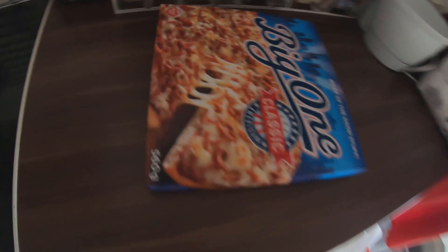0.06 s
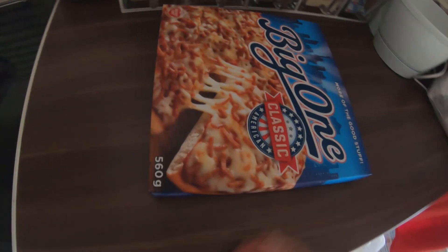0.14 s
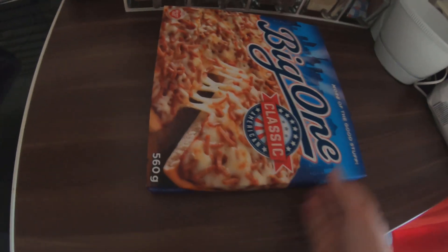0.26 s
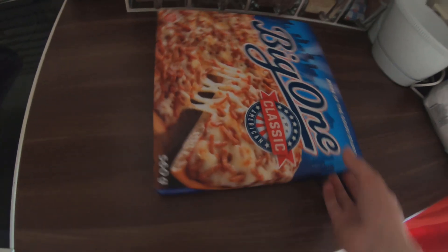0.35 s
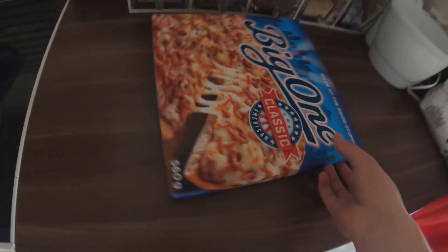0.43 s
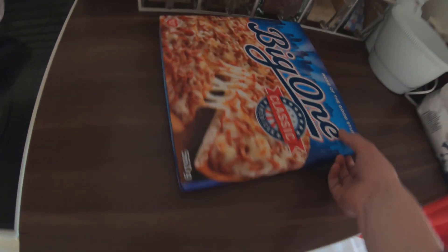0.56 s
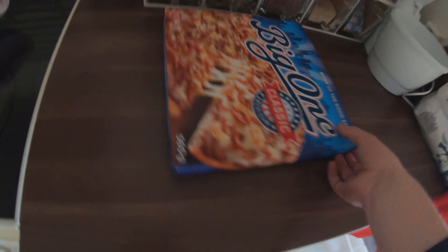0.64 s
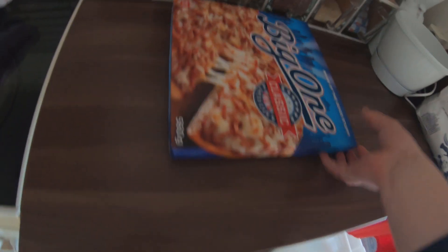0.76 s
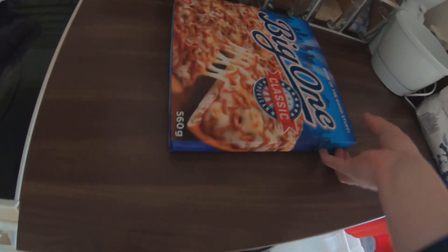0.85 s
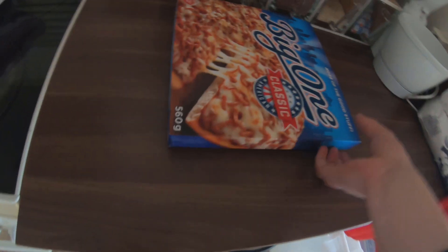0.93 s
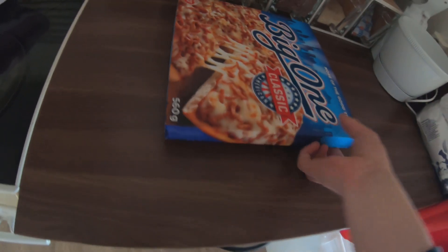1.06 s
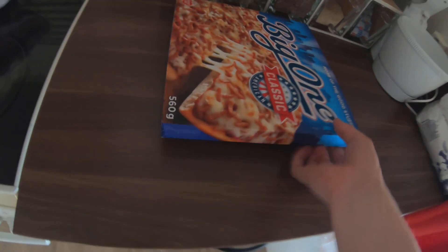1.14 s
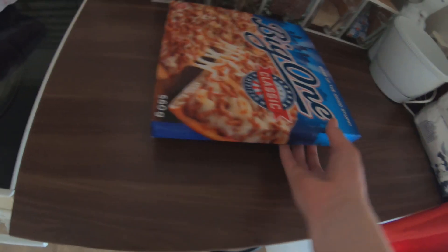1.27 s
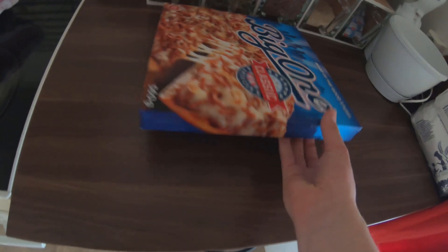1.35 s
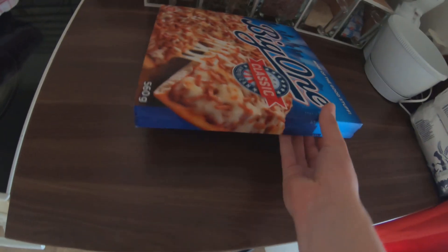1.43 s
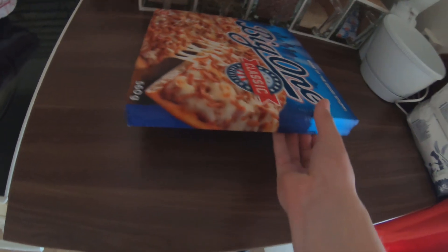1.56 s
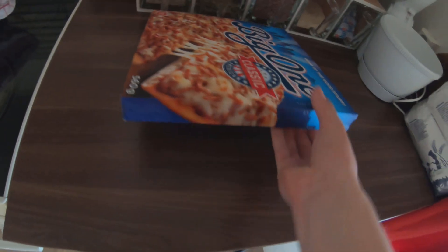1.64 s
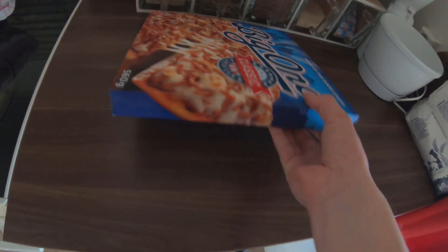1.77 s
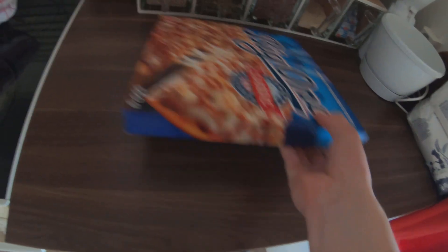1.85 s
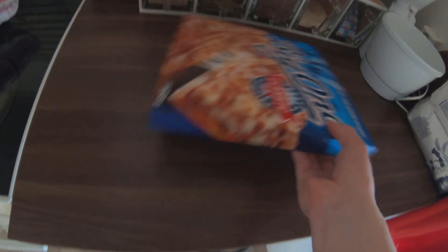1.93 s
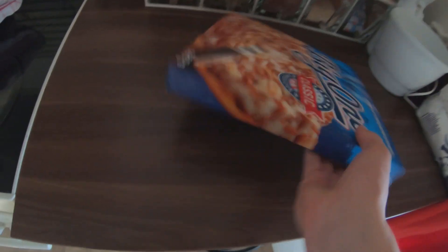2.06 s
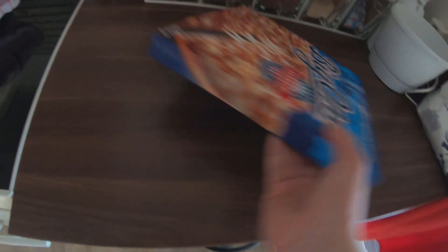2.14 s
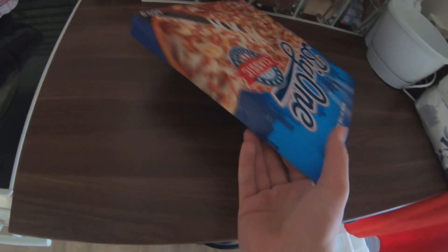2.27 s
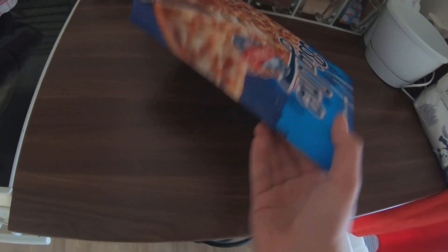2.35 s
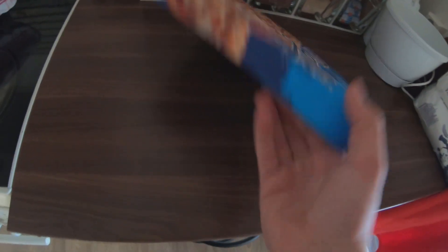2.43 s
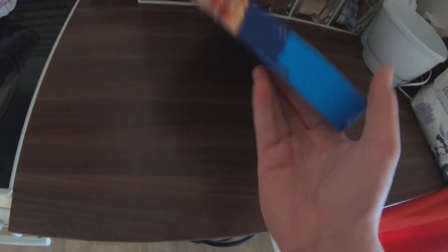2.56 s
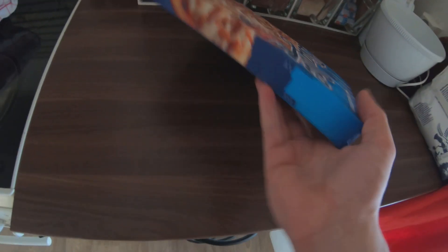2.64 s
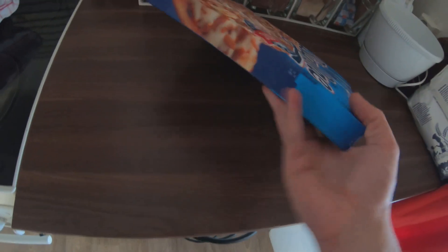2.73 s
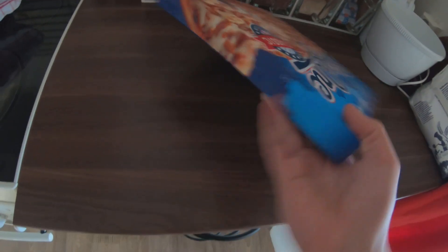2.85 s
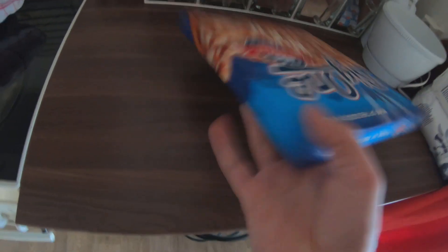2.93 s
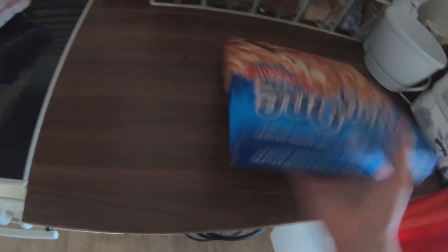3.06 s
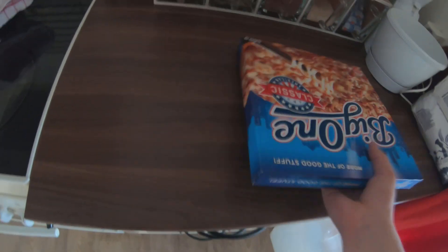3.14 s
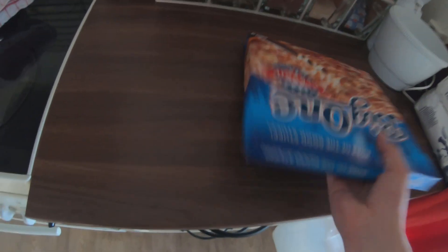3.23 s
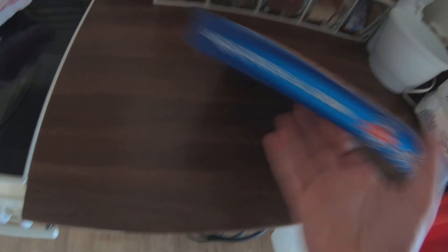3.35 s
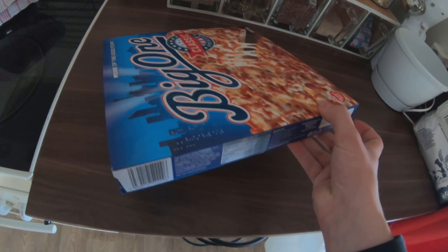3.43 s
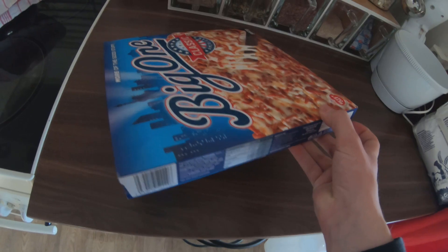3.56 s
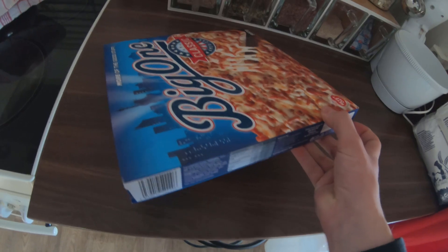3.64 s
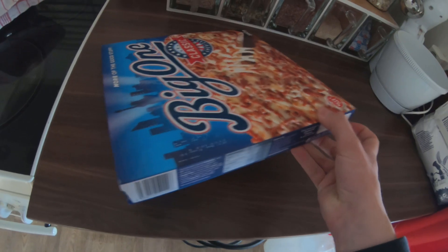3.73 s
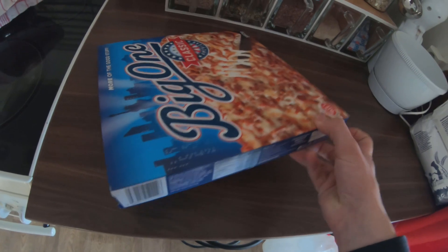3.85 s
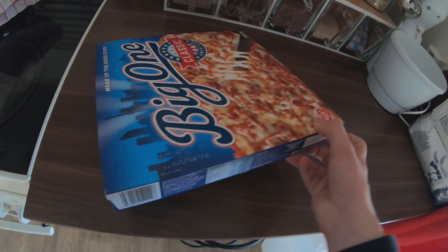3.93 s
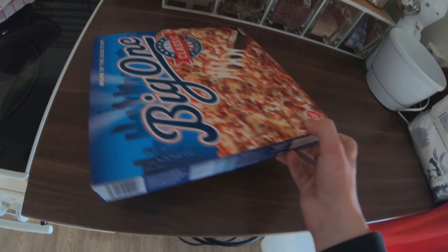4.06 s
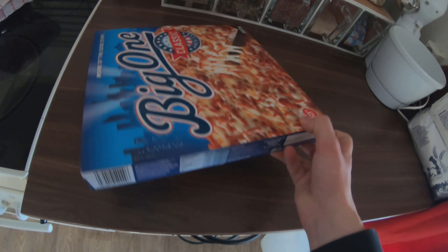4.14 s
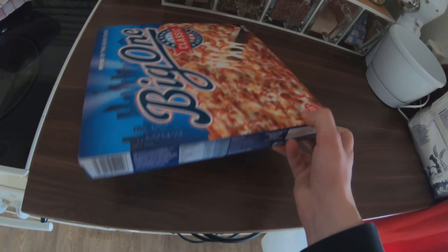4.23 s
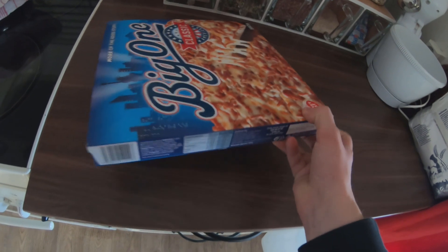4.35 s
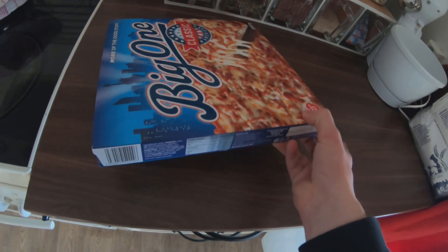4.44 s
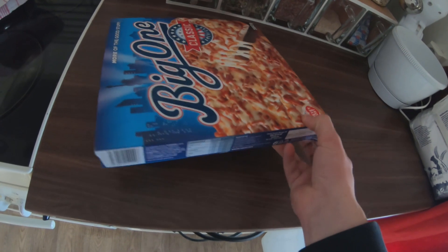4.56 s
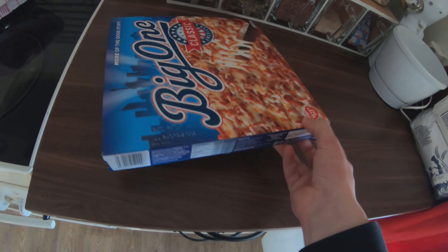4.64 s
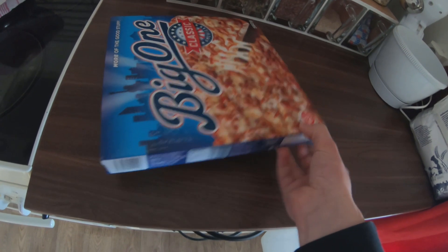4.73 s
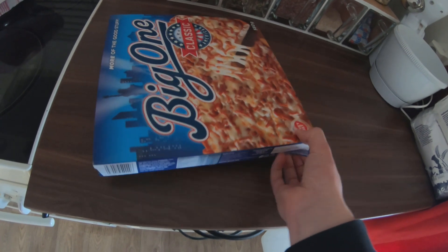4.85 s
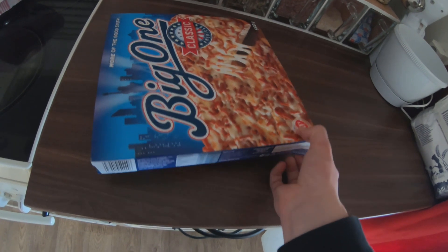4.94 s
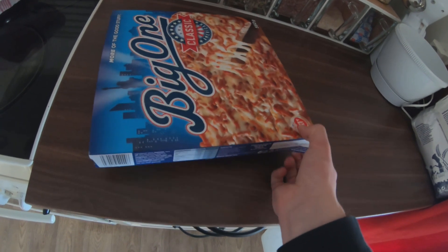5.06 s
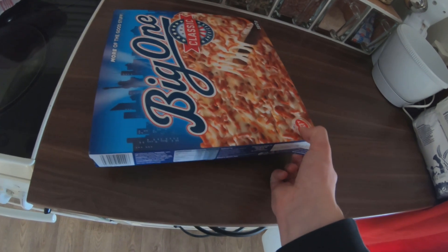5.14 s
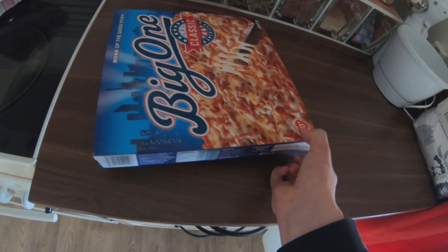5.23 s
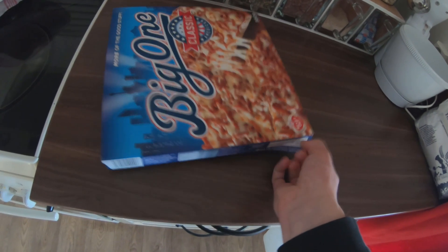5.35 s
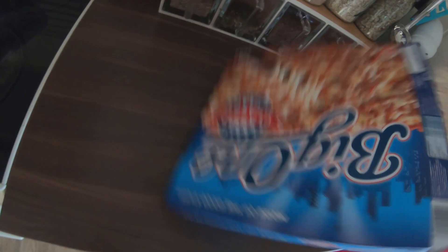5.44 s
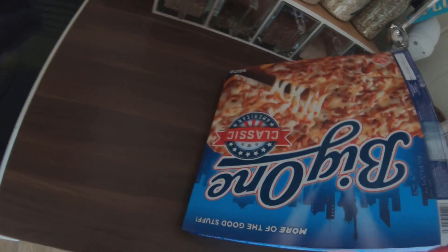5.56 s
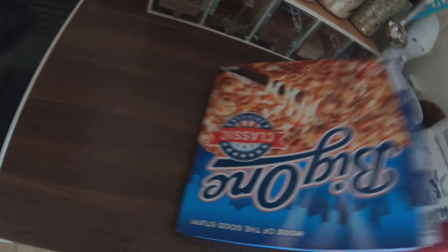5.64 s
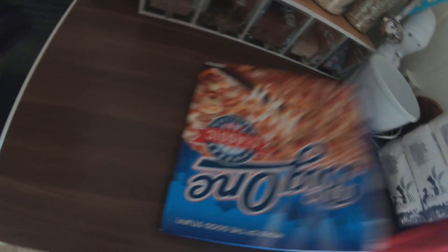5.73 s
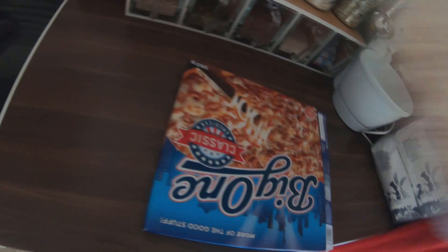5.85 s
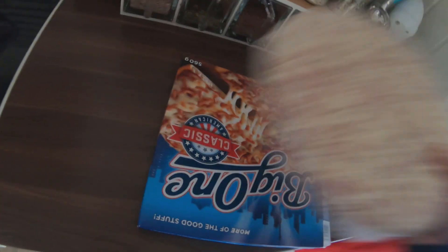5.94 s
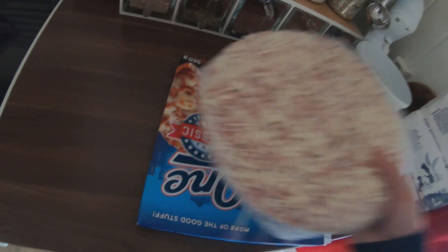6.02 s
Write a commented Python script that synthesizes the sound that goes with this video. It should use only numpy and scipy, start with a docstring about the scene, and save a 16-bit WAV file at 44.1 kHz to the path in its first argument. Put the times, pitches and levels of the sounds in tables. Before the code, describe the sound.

Close, dry-sounding handling of a stiff box holding a frozen pizza. Light finger taps and faint rubbing lead to busier, louder knocks and a strong slide as it is turned over; the room ring stops abruptly around the middle. Quieter scattered clicks and bumps come next, then heavy cardboard knocks with bright snapping wrap. Short kitchen reflections and soft low rumble from a head-worn microphone.

```python
"""A cardboard box with a hard frozen pizza loose inside is tapped, lifted, turned over and dropped on a kitchen counter.
It opens on a rubbing grip and soft taps, then firmer knocks; just after 3.4 s the room's ring is cut short.
Sparser handling follows, then hard knocks and a flurry of plastic and flap snaps from about 5.1 s to the end.
Blows ring the box, rubs are stuttering noise, snaps are tiny pitched puffs, and a small kitchen answers blows and snaps.
Air and the low rumble of a head-worn camera run throughout; the loudest peaks are rounded off softly."""
import sys
import numpy as np
from scipy import signal
from scipy.fft import rfft, irfft, next_fast_len
from scipy.io import wavfile
from scipy.ndimage import map_coordinates

SR = 44100
rng = np.random.default_rng(int(sys.argv[2]) if len(sys.argv) > 2 else 0)


def output_pcm(signal):
    """Save a mono or channel-first signal as 16-bit PCM at the path in sys.argv[1].

    Samples are clipped to [-1, 1] before scaling.
    """
    pcm = np.clip(np.atleast_2d(signal).T, -1, 1) * 32767
    wavfile.write(sys.argv[1], SR, np.round(pcm).astype(np.int16))


N = 268569


def amp(db):
    """Gain of a level in dB."""
    return 10 ** (np.asarray(db) / 20)


def unit(x):
    """Scale x to rms 1."""
    return x / np.sqrt(np.mean(x ** 2) + 1e-20)


def along(points, hz):
    """Read a (frequency, value) curve on a log frequency axis."""
    point_hz, value = np.transpose(points)
    return np.interp(np.log(hz + 1), np.log(point_hz + 1), value)


def curves(rows):
    """Draw one automation curve, sample by sample, for each column after the time."""
    time_s, *columns = np.transpose(rows)
    return [np.interp(np.arange(N) / SR, time_s, column) for column in columns]


def wobble(rate_hz):
    """A smooth random curve with rate_hz knots a second."""
    knots = rng.standard_normal(int(N * rate_hz / SR) + 4)
    return map_coordinates(knots, [np.arange(N) * rate_hz / SR])


def filtered(x, response):
    """Shape x by a complex response of frequency."""
    size = next_fast_len(N + SR // 2)  # spare room keeps tails from wrapping round
    spectrum = rfft(x, size) * response(np.fft.rfftfreq(size, 1 / SR))
    return irfft(spectrum, size)[..., :N]


def ringing(x, modes):
    """Ring x through resonances between steep low and high skirts; white noise keeps its rms."""
    def response(f):
        peaks = 0
        for k, (centre, width, db) in enumerate(modes):
            peak = 1j * f * width / (centre * centre - f * f + 1j * f * width)
            peaks = peaks + (-1) ** k * amp(db) * peak  # neighbours alternate in sign
        low, high = 0.91 * modes[0][0], 1.275 * modes[-1][0]
        low_skirt = f * f / (f * f - low * low - 1.4j * f * low)
        high_skirt = high * high / (high * high - f * f + 1.4j * f * high)
        shape = peaks * low_skirt * high_skirt
        return unit(np.abs(shape)) * np.exp(1j * np.angle(shape))
    return filtered(x, response)


# How alike the left and right ports hear a noise: pitch_hz, likeness (1 = identical)
LIKENESS = [(60, 0.77), (250, 1), (600, 0.76), (1200, 0.4), (2500, 0.76), (5000, 0.62), (9000, .05),
            (15000, 0.13)]


def pair(likeness):
    """Stereo white noise, built from mid and side noises so the ports share more or less of each frequency."""
    def mid_and_side(hz):
        turn = np.arccos(np.clip(along(likeness, hz), -1, 1)) / 2
        return np.array([np.cos(turn), np.sin(turn)])
    mid, side = filtered(rng.standard_normal((2, N)), mid_and_side)
    return np.array([mid + side, mid - side])


# Blows of fingers, nails and pizza, levels before the mix of parts: start_s, level_db,
# weight_db (panel), edge_db (board), shock_db (counter), contact_ms (t60 before each part's stretch),
# rise_ms, left_right_db (positive = left)
BLOWS = [(0.004, -35, 11.5, -17, 9, 310, 0.97, 0), (0.298, -27, -17, -11, -28, 15, 1.6, 0),
         (0.462, -37, -23, -10, -22, 220, 0.5, -3), (0.498, -33.5, -5, -18, -28, 92, 0.48, 1.9),
         (0.563, -24, -28, 0.5, -45, 50, 1.16, 1), (0.608, -40, -2.5, -6, -25, 190, 0.5, 4),
         (0.946, -29.5, -9, -3.5, -25, 420, 0.68, 2), (1.044, -14.5, -33, -13, -59, 23, 0.89, -0.5),
         (1.178, -13, -16, -6, -53, 43, 1.16, 0.5), (1.299, -19, -16, -9, -17.5, 49, 0.72, 0),
         (1.488, -35, -8.5, -0.5, -25, 100, 0.9, 5), (1.873, -17.5, -15, -12, -34, 95, 0.49, 3),
         (2.017, -14, -4.5, -3.5, -24, 124, 1.33, 2), (2.084, -1.5, -24, -25, -38, 50, 0.78, -1),
         (2.241, -23.5, -9, 1, -22, 220, 3.3, 1), (2.529, -13.5, -34, -5.5, -43, 80, 4.4, 1),
         (2.62, -25.5, -18, -6, -19.5, 240, 0.51, 2.5), (2.816, -22, -29, -2, -43, 170, 0.14, 0.5),
         (2.898, -10.5, -9, -13, -22, 33, 2.15, 1), (3.007, -44.5, 23, -9, 6, 140, 0.42, 1),
         (3.042, -3.5, -10, -13.5, -21, 92, 0.52, 0.5), (3.124, -12, -1.5, 0, -16, 44, 0.92, -1),
         (3.196, -23, -38, -2, -26, 400, 0.21, -4), (3.353, -10, -7, -15, -28, 74, 0.13, -1.5),
         (3.421, -23.5, -42, 1, -51, 20, 0.19, -1), (3.529, -24.5, -19.5, -13.5, -52, 63, 2.1, 1.5),
         (3.795, -26.5, -12, 2.5, -18, 28, 0.71, 0), (4.24, -21.5, -25, -3, -55, 73, 1, 1),
         (4.37, -33.5, -16, -1, -50, 94, 1.2, 0), (4.49, -24.5, -21.5, -5, -53, 66, 1.7, -1),
         (4.549, -7, -30.5, -9, -75, 70, 5.4, 0.5), (4.744, -40, -5.5, -2, -33, 120, 1.3, 8),
         (4.776, -21, -18.5, -15, -48, 29, 0.62, 1.6), (5.134, -29, -17.5, -25, -47, 160, 0.4, 1),
         (5.311, -12, -14.5, 7, -16, 50, 0.86, 0), (5.327, -18.5, -9, 2.5, -4.5, 98, 0.32, 1),
         (5.48, -1.5, -14.5, -29, -11.5, 32, 1.02, -4), (5.812, -11.5, -17.5, 5.5, -21, 40, 0.82, -5),
         (5.821, -13, -3.5, -12, -17.5, 104, 1.9, 3.5)]
# Resonances of each part: pitch_hz, width_hz, level_db
COUNTER_MODES = [(43.2, 33.3, -1), (59.3, 7.9, 7), (95, 56, -4)]  # kitchen counter
PANEL_MODES = [(127.8, 28.4, -5), (158.7, 47, 0), (245.8, 25, -2), (336.7, 70, -7)]  # large box panels
HOLLOW_MODES = [(420, 64, -5), (553, 54, 0), (715.5, 85, 0)]  # air inside the box
BOX_MODES = [(785, 130, -3.5), (930, 178, -2.5), (1163, 136, -6), (1321, 107, -4.5), (1667, 1480, -13)]  # body of the box
BOARD_MODES = [(1974, 700, -2), (2810, 730, 6.5), (3060, 1510, 4.5), (4150, 4500, -13)]  # stiff cardboard
CRACK_MODES = [(5160, 2730, 38.5), (6750, 690, -16.5), (9940, 7500, -26.5), (14200, 220, 8)]  # bright crack and hiss
# the air inside takes part of a blow's weight, less what the counter drains; the crack follows the edge
HOLLOW_SHARE, COUNTER_DAMPS, CRACK_SHARE = 0.82, 0.26, 1.14


def knocks():
    """Each blow is a push and a short rattle of contact ringing every part; a slow rise pushes high parts less."""
    # (modes, level dB, stretch of the contact, share of the push)
    parts = [(BOX_MODES, -2.5, .75, 3.5), (COUNTER_MODES, 3, 1.6, 2.5), (PANEL_MODES, 2.2, 1.5, 2.2),
             (HOLLOW_MODES, -4, 1.1, 3), (BOARD_MODES, -3, .6, 4.5), (CRACK_MODES, -9, .45, 5)]
    longest = SR // 6
    out = np.zeros((2, N))
    for column, (modes, part_db, stretch, push_share) in enumerate(parts):
        centre = modes[len(modes) // 2][0]
        rattle, force = pair(LIKENESS), np.zeros((2, N))
        for start_s, level_db, weight, edge, shock, contact_ms, rise_ms, left_right_db in BLOWS:
            hollow = HOLLOW_SHARE * weight - COUNTER_DAMPS * shock
            reach_db = (0, shock, weight, hollow, edge, CRACK_SHARE * edge)[column]
            start = round(start_s * SR)
            at = slice(start, min(start + longest, N))
            ms = 1000 * np.arange(at.stop - at.start) / SR
            rise = max(rise_ms, .2)
            fade = amp(-60 * ms / (max(contact_ms, 4) * stretch))
            shake = (1 - np.exp(-ms / rise)) * fade
            push = push_share * min(1, 900 / (centre * rise)) * amp(-ms * centre / 22)
            # low parts reach both ports more alike
            sides = amp(np.array([[left_right_db], [-left_right_db]]) / 2 * min(1, centre / 900))
            force[:, at] += amp(level_db + reach_db + part_db) * (rattle[:, at] * shake + push) * sides
        out += ringing(force, modes)
    return out


# Snaps of the wrap and the glued flap: start_s, level_db (before a common trim), pitch_hz
WRAP_AND_FLAP_SNAPS = [(1.127, -44, 3220), (1.267, -37, 1420), (1.3887, -37.5, 1930), (1.78, -36, 3080),
                       (1.929, -35.5, 3460), (2.315, -28, 2080), (2.3544, -31, 2170), (2.664, -29.5, 3340),
                       (2.701, -48, 2860), (2.732, -48.5, 5850), (2.7666, -42.5, 2700), (2.793, -28, 3190),
                       (3.472, -57, 1910), (3.795, -21, 4950), (3.972, -46, 2340), (4.143, -37, 8000),
                       (4.213, -23, 4200), (4.7976, -28, 2580), (4.9088, -30, 7890), (5.091, -54, 9900),
                       (5.1075, -25, 9240), (5.1499, -30, 2210), (5.195, -35, 5050), (5.2731, -11.5, 2370),
                       (5.3115, -16, 3830), (5.437, -39, 3390), (5.8133, -8.5, 5380), (5.9523, -26, 7200),
                       (5.967, -20.5, 2330), (5.9883, -24, 3210), (6.0042, -16.5, 3300),
                       (6.0655, -25, 3100), (6.0806, -36.5, 3100)]
SNAP_T60_S = .014


def snaps():
    """Each snap is a puff of dulled noise on a sine carrier, fading fast and stopped within 6 ms."""
    out, t = np.zeros((2, N + SR)), np.arange(256) / SR
    for start_s, level_db, pitch_hz in WRAP_AND_FLAP_SNAPS:
        own = rng.standard_normal((2, len(t)))
        shared = 1.32 * rng.standard_normal(len(t))  # the same in both ports
        puff = signal.lfilter([1], [1, -.75], own + shared)
        envelope = amp(level_db - 5.5 - 60 * t / SNAP_T60_S)
        start = round(start_s * SR)
        out[:, start:start + len(t)] += envelope * puff * np.sin(2 * np.pi * pitch_hz * t)
    return out[:, :N]


# Grip of the hand on the box, in two stretches of rows: start_s, pressure_db, brightness_db
HAND_GRIP = [
    [(0.0, -25, 1), (0.12, -39, 3), (0.27, -56, -2), (0.55, -41.5, 6), (1.1, -48.5, 9.5), (1.52, -53.5, 8),
     (1.83, -36, 7), (1.97, -39.5, 6.5), (2.1, -27, 2.5), (2.35, -39.5, -1), (2.72, -36.5, 9.5),
     (3.02, -36.5, 4.5), (3.14, -16, -0.5), (3.25, -32, 3), (3.43, -30, 4.5)],
    [(3.44, -53, -6), (3.52, -52, -2), (3.62, -66, -27), (3.78, -42, -1), (3.91, -54, 5), (4.1, -42, 3),
     (4.58, -49, 6), (4.85, -40, -8), (4.95, -43.5, -6), (5.16, -57, 29), (5.37, -27, 10.5),
     (5.57, -20.5, -15), (5.62, -32, 7), (5.83, -48, 19.5), (5.91, -34.5, 13), (6.09, -47.5, 29)],
]
SAG_DB = -4  # level of the held panel against the box


def rubbing():
    """Rough contact: noise whose force stutters and catches, heard through each part of the box."""
    pressure, bright = curves(np.vstack(HAND_GRIP))
    held = spread(pressure, bright, pressure + SAG_DB)
    box, panel, board, hiss = np.hypot(held, slides())
    # fibres catch and let go, a new force every 32 samples
    catches = amp(1.9 * rng.exponential(1, N // 32 + 1)).repeat(32)[:N]
    grip = amp(.8 * wobble(45) + 2 * wobble(130)) * catches

    def part(modes):
        loosening = amp(2.2 * wobble(60))  # each part also loosens by itself
        return ringing(unit(grip * loosening) * pair(LIKENESS), modes)

    body = box * (part(HOLLOW_MODES) * amp(-4.5) + part(BOX_MODES))
    return body + panel * part(PANEL_MODES) + board * part(BOARD_MODES) + hiss * part(CRACK_MODES)


# Short slides of skin, pizza or wrap on board: start_s, length_s, pressure_db, brightness_db,
# weight_db (panel against pressure)
SHORT_SLIDES = [(0.01, 0.1, -39, -1, 6), (0.27, 0.1, -40.5, 1.5, -12), (0.456, 0.064, -37.5, -22, -16),
                (0.508, 0.037, -32.5, 3, -21), (0.62, 0.16, -37.5, -7, -23), (0.795, 0.051, -36.5, -41, -1),
                (0.936, 0.074, -33, 2, -5), (1.259, 0.034, -36, -4, -15), (1.427, 0.13, -39.5, 0, 2),
                (1.792, 0.094, -24, 2.5, -7), (2.015, 0.038, -17.5, 7, 9.5), (2.055, 0.045, -18.5, 4, -25),
                (2.236, 0.039, -23.5, 0, -1), (2.511, 0.026, -37, 11, 2.5), (2.836, 0.035, -28, 5, -21),
                (2.855, 0.08, -23, 6, -5), (2.983, 0.056, -24.5, 3.5, -3), (3.126, 0.021, -18.5, -17, 5),
                (3.178, 0.069, -21, -3, -22), (3.385, 0.051, -26, -15, 0), (4.176, 0.11, -41.5, 21.5, -20),
                (4.762, 0.18, -36.5, 12.5, -1.5), (4.881, 0.024, -50, 18, 17),
                (5.241, 0.04, -29, 23.5, -10), (5.316, 0.081, -19.5, -12, 5.5),
                (5.414, 0.084, -41, 27.5, 18.5), (5.488, 0.12, -24, 15, 8.5), (5.817, 0.11, -31, -7, 14.5),
                (5.966, 0.06, -39, 22, 5)]


def slides():
    """Force of the short slides on box, panel, board and hiss: each grips fast, holds and lets go."""
    force = np.zeros((4, N))
    for start_s, length_s, pressure_db, bright_db, weight_db in SHORT_SLIDES:
        arch = np.sin(np.linspace(0, np.pi, round(length_s * SR)))
        grip = arch.clip(0) ** 0.5
        gains = spread(pressure_db, bright_db, pressure_db + weight_db)
        force[:, round(start_s * SR):][:, :len(grip)] += gains[:, None] * grip
    return force


# levels against the box; the board takes a share of the brightness, the hiss all of it
BOARD_DB, BOARD_SHARE, HISS_DB = -8.5, 0.29, -21


def spread(pressure_db, bright_db, panel_db):
    """Gains of box, panel, board and hiss under one contact: brightness lifts only the last two."""
    board_db = pressure_db + BOARD_DB + BOARD_SHARE * bright_db
    hiss_db = pressure_db + HISS_DB + bright_db
    return amp([pressure_db, panel_db, board_db, hiss_db])


# Decay of the small kitchen: pitch_hz, t60_s
KITCHEN_DECAY = [(100, 0.32), (700, 0.38), (2000, 0.37), (5000, 0.35), (12000, 0.25)]


def kitchen(x):
    """Each frequency of the room's answer dies at its own speed; the box moves, so each moment has its own answer."""
    size = 8192  # samples of sound sharing one answer
    hz, t, noise = signal.stft(pair(LIKENESS), SR, nperseg=256)
    out, frames = np.zeros((2, N + 4 * size)), size // 64
    decay = amp(-60 * t[:frames] / along(KITCHEN_DECAY, hz)[:, None])
    for k, start in enumerate(range(0, N - size, size)):
        fading = noise[..., k * 56:][..., :frames] * decay
        tail = signal.istft(fading, SR, nperseg=256)[1]
        # the last piece takes everything that is left
        piece = x[:, start:start + size] if start + 2 * size < N else x[:, start:]
        answer = signal.fftconvolve(piece, tail / np.linalg.norm(tail[0]), axes=1)
        out[:, start + 150:][:, :answer.shape[1]] += answer  # first return after 150 samples
    return out[:, :N]


# Spectrum of the kitchen air: pitch_hz, level_db (per Hz, relative)
AIR_SPECTRUM = [(47, -40), (80, -11), (109, -20.5), (343, 1.5), (709, -2), (965, -21), (2040, -17.5),
                (6010, -26), (15500, -46)]
# Spectrum of the rumble: pitch_hz, level_db (per Hz, relative)
RUMBLE_SPECTRUM = [(12, -20.5), (25, -7.5), (50, -16), (70, -22.5), (90, -73), (200, -120)]
# Head movement on the camera body, before a random wobble: start_s, level_db
HEAD_MOVEMENT = [(0.0, -66), (0.3, -46.5), (0.63, -36), (1.05, -35.5), (1.56, -39.5), (1.8, -35),
                 (2.19, -43), (2.59, -33.5), (2.95, -50), (3.07, -45), (3.49, -57), (3.61, -33), (3.8, -54),
                 (4.07, -36.5), (4.9, -39), (5.3, -43.5), (5.55, -23), (5.89, -50), (6.09, -30.5)]


def background():
    """Steady noise for the kitchen air and lumpy low noise for the wearer's head."""
    air = unit(filtered(pair(LIKENESS), lambda hz: amp(along(AIR_SPECTRUM, hz))))
    shake = unit(filtered(pair(LIKENESS), lambda hz: amp(along(RUMBLE_SPECTRUM, hz))))
    movement = amp(curves(HEAD_MOVEMENT)[0] + 2 * wobble(9))
    return amp(-59) * air + movement * shake


ROOM_CUT_S = 3.437


def scene():
    """Handling, room and background; room tails of earlier sound stop dead at the cut."""
    hits = knocks() + snaps()
    before = np.arange(N) < ROOM_CUT_S * SR
    first, second = hits * before, hits * ~before
    room = amp(-6.0) * (kitchen(first) * before + kitchen(second))
    return hits + room + rubbing() + background()


# Tone of the microphone ports: pitch_hz, level_db
PORT_TONE = [(20, -8), (45, -24), (100, -14), (11000, 0), (13000, -0.5), (14500, -17.5), (15800, -17)]
# Phase by which the left port leads the right: pitch_hz, lead_rad
LEFT_LEAD = [(100, 0), (1000, -.5), (3000, -.3), (8000, -1), (15000, -3)]
TOP_HZ = 15780


def record(dry):
    """The ports colour the sound with a small phase offset, the input saturates softly, and the top is cut off."""
    def port_response(hz):
        half_lead = along(LEFT_LEAD, hz) / 2 * np.array([[1], [-1]])
        return amp(along(PORT_TONE, hz)) * np.exp(1j * half_lead)
    ports = filtered(dry, port_response)
    soft = ports / (1 + np.abs(ports) ** 6) ** (1 / 6)
    return filtered(soft, lambda hz: hz < TOP_HZ)


dry = scene()
out = record(dry)
output_pcm(out)
```